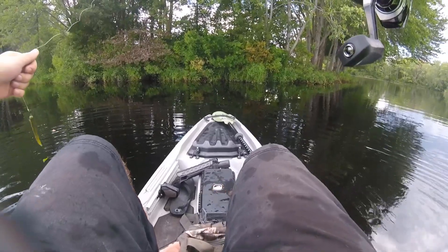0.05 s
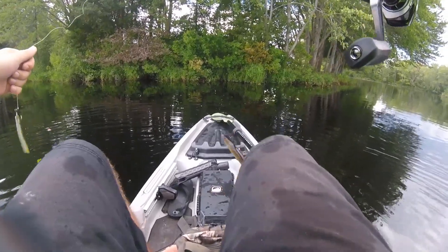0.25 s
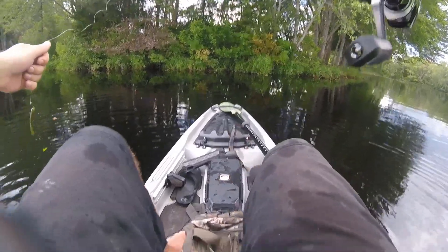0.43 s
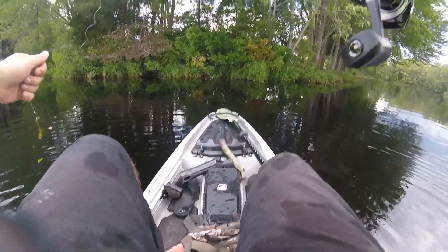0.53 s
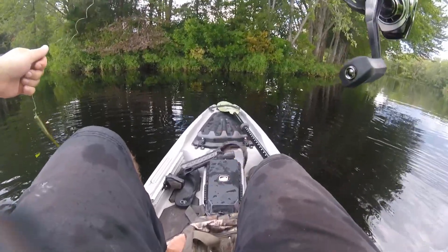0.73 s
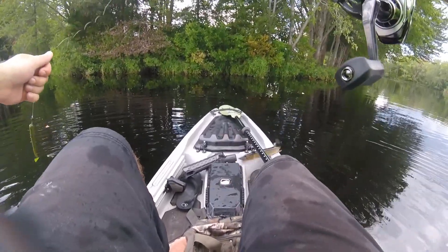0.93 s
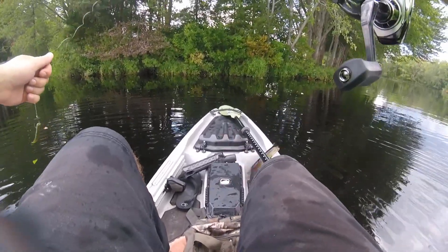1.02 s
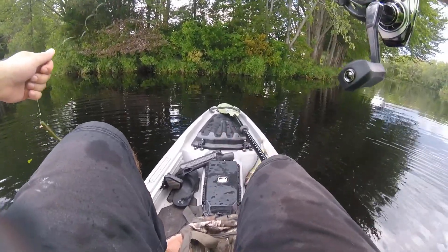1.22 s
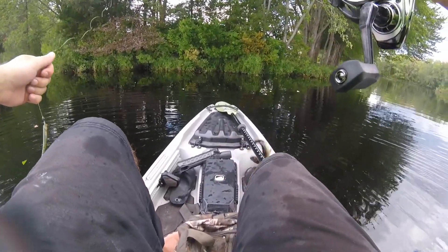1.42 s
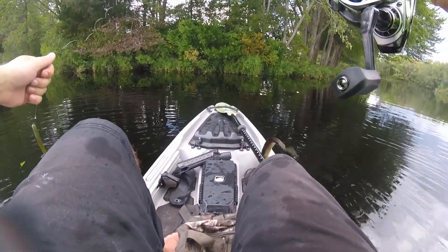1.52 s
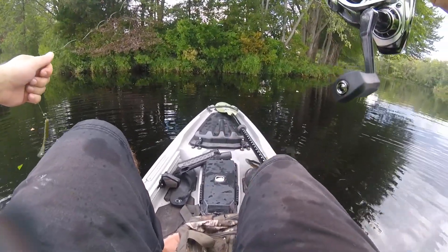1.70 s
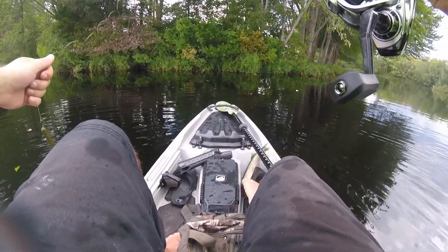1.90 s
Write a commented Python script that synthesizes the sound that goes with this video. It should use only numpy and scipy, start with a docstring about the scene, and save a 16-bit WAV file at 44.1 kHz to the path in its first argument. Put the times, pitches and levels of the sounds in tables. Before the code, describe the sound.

A small fish thrashes against a hollow plastic kayak, close to the microphone. Faint taps at 0.1 s, knocks at 0.2, a hard slap at 0.3, lighter clatter around 0.4, then the heaviest boomy smack at 0.59 with rapid knocks and wet scuffs to 0.72. Softer thumps at 0.8, 0.94 and 1.07; sparse ticks near 1.3, 1.45 and 1.56, a small flutter at 1.77. Low hull rumble, faint air and insect hiss.

```python
"""A small fish thrashes in the footwell of a plastic kayak: each slap excites decaying modes of the
hollow hull and cracks wetly, as a short ragged burst of noise with a tone in it.
Between slaps the body slides: random bumps rattle the hull modes and drops make a spattering hiss.
The floating hull rumbles as noise through low resonances, under still air (shaped noise) and a
throbbing band of insect hiss from the bank."""
import sys
import numpy as np
from scipy import signal
from scipy.fft import rfft, irfft
from scipy.io import wavfile
from scipy.ndimage import uniform_filter1d

SR = 44100
rng = np.random.default_rng(int(sys.argv[2]) if len(sys.argv) > 2 else 0)


def transcribe(signal):
    """Save signal, clipped to [-1, 1], as a 16-bit WAV file at the path in sys.argv[1]."""
    frames = np.atleast_2d(signal).T
    limited = np.clip(frames, -1, 1)
    pcm = np.round(limited * 32767).astype(np.int16)
    wavfile.write(sys.argv[1], SR, pcm)


N = 85995

# Hull modes, from low to high groups: (frequency [Hz], relative level [dB], 60 dB decay time [s])
DRUM_MODES = [(117.3, -4.5, 0.13), (166, -4, 0.11), (198.9, -6, 0.12)]
KNOCK_MODES = [(242.3, -5.5, 0.11), (295.5, -2, 0.073), (354.6, 1.5, 0.03), (482.2, -1, 0.066)]
PANEL_MODES = [(537.6, -1, 0.023), (715, -3, 0.041), (856.6, -17.5, 0.096), (984, -14.5, 0.056),
               (1111, -5.5, 0.039)]


def amp(db):
    """Level definition: 20 dB is a factor of ten in amplitude."""
    return 10 ** (np.asarray(db) / 20)


def unit_rms(x):
    """Normalization: scales a signal to unit root-mean-square amplitude."""
    return x / np.sqrt(np.mean(x ** 2) + 1e-20)


def colour(x, points):
    """Linear filtering: weights the spectrum by (Hz, dB) points, with steep skirts past the ends."""
    skirt_db = 50  # per unit of natural-log frequency
    hz, db = np.transpose(points)
    log_hz = np.log(np.fft.rfftfreq(len(x), 1 / SR) + 1)
    below = np.maximum(np.log(hz[0]) - log_hz, 0)
    above = np.maximum(log_hz - np.log(hz[-1]), 0)
    gain_db = np.interp(log_hz, np.log(hz), db) - skirt_db * (below + above)
    return irfft(rfft(x) * amp(gain_db), len(x))


def resonate(x, hz, width_hz):
    """Damped resonance: shifts its frequency to zero, low-passes with one pole and shifts back."""
    turn = np.exp(2j * np.pi * hz * np.arange(len(x)) / SR)
    pole = np.exp(-np.pi * width_hz / SR)
    return 2 * (turn * signal.lfilter([1 - pole], [1, -pole], x / turn)).real


def add(mix, start_s, sound):
    """Superposition: sums a sound into the mix from its start time."""
    part = mix[max(round(start_s * SR), 0):][:len(sound)]
    part += sound[:len(part)]


def still_air():
    """Broadband noise: white noise takes the spectrum of still air."""
    # Air spectrum: (frequency [Hz], relative density [dB])
    air_spectrum = [(12, -103), (20, -12.5), (102, 4.5), (154, -17.5), (325, -10.5), (596, -20.5),
                    (979, -24.5), (1520, -34.5), (2120, -33), (4980, -39.5), (6940, -31.5), (10200, -45.5),
                    (12100, -45.5), (14600, -56)]
    return amp(-44.5) * unit_rms(colour(rng.standard_normal(N), air_spectrum))


def hull_rumble():
    """Random excitation of resonances: noise drives low hull modes under a changing level."""
    # Rumble level: (time [s], level [dB])
    rumble_level = [(0, -44.5), (.2, -48), (.4, -25.5), (.55, -44), (.75, -32), (.9, -35.5), (1.05, -35),
                    (1.25, -48), (1.45, -46), (1.7, -46.5), (1.95, -50)]
    # Rumble resonances: (frequency [Hz], width of each of two passes [Hz], relative level [dB])
    rumble_modes = [(66.1, 2.4, -17), (101.6, 78, -4.5)]
    push = rng.standard_normal(N)
    rumble = np.zeros(N)
    for hz, width_hz, db in rumble_modes:
        rumble += amp(db) * unit_rms(resonate(resonate(push, hz, width_hz), hz, width_hz))
    level_db = np.interp(np.arange(N) / SR, *np.transpose(rumble_level))
    return amp(level_db) * unit_rms(rumble)


def insects():
    """Amplitude modulation: a narrow band of noise throbs with a slow random level."""
    hz, width_hz = 6700, 700  # width of each of two passes
    level_db, throb_db = -66, 4  # throb: RMS swing of the level
    hiss, throb = rng.standard_normal((2, N))
    band = resonate(resonate(hiss, hz, width_hz), hz, width_hz)
    throb = unit_rms(uniform_filter1d(uniform_filter1d(throb, 900), 900))
    return amp(level_db + throb_db * throb) * unit_rms(band)


def ring(modes, t, detuning, rise_s, centre_hz=None):
    """Modal superposition: sums decaying sines, weaker the farther from the struck spot's centre."""
    spot_db = 15.5  # loss per octave from the centre
    total = np.zeros(len(t))
    for k, ((hz, db, t60_s), shift) in enumerate(zip(modes, detuning)):
        loss_db = 0 if centre_hz is None else spot_db * abs(np.log2(hz / centre_hz))
        decay = amp(db - loss_db - 60 * t / t60_s)
        total += (-1) ** k * decay * np.sin(2 * np.pi * hz * (1 + shift) * t)
    return (1 - np.exp(-t / rise_s)) * total


def hull_boom(t):
    """Falling modal pitch: the lowest modes swell, starting sharp and sagging to pitch."""
    # Boom modes: (frequency [Hz], relative level [dB], 60 dB decay time [s])
    boom_modes = [(64.2, 1.5, 0.14), (46.4, -18.5, 0.57)]
    rise_s, sag, sag_s = 0.0057, 0.22, 0.026  # sag: initial fraction sharp, and its time constant
    sagging_t = t + sag * sag_s * (1 - np.exp(-t / sag_s))
    return (1 - np.exp(-t / rise_s)) * ring(boom_modes, sagging_t, np.zeros(2), rise_s)


def wet_crack(u, noise, ragged_noise, soft_s, crack_hz, crack_db, treble_db):
    """Impact noise: a softer contact lengthens the rise and decay of a ragged burst."""
    # Crack body spectrum: (frequency [Hz], relative level [dB])
    body_spectrum = [(800, 11.5), (1500, 0.5), (3000, 3.5), (4500, -18.5)]
    # Crack treble spectrum: (frequency [Hz], relative level [dB])
    treble_spectrum = [(4500, 7.5), (6300, 8.5), (8000, -2.5), (10000, -12.5), (11300, -7.5), (12500, -25),
                       (14000, -37)]
    body_db, tone_db = -9, -3  # tone at the crack's centre
    tail_db, tail_t60_s = -45.5, 0.09
    ragged = amp(0.58 * unit_rms(uniform_filter1d(uniform_filter1d(ragged_noise, 36), 36)))
    decay = amp(-60 * u / (0.018 + 6 * soft_s)) + amp(tail_db - 60 * u / tail_t60_s)
    burst = decay * (1 - np.exp(-(u / soft_s) ** 2)) * ragged
    tone = amp(tone_db) * np.sin(2 * np.pi * crack_hz * u)
    smack = unit_rms(colour(noise, body_spectrum)) + tone
    treble = unit_rms(colour(noise, treble_spectrum))
    return burst * (amp(crack_db + body_db) * smack + amp(treble_db) * treble)


def slaps():
    """Impulsive excitation: each slap cracks and rings the hull's mode groups, the boom arriving last."""
    # Slaps: (time [s], relative levels of crack, boom, drum, knock, panel and crack treble [dB],
    #         knock centre [Hz], crack centre [Hz], softness [ms], panel centre [Hz],
    #         plastic ring re crack [dB])
    slap_table = [(0.0777,-41.5,-29,-37.5,-34.5,-39,-52,302,3770,1.1,690,-3.5),(.1012,-43,-56,-35.5,-28.5,-44,-58,225,3940,1.2,615,-8),
                  (0.1858,-24,-22.5,-32,-15.5,-29,-46,405,3230,0.41,603,-9),(0.197,-16,-38,-37,-14,-15.5,-32.5,282,3000,2.7,960,-12),
                  (0.2149,-21,-49,-52,-13,-13.5,-45,296,2070,0.13,544,0.5),(0.2993,-4,-12,-8,-1.5,-11.5,-25.5,226,2880,0.33,920,-13.5),
                  (0.3087,-23,-19,-9.5,-12.5,-15,-34,269,2230,0.29,970,-20),(0.3175,-32,-14.5,-20,-11.5,-38,-44,357,2300,0.54,600,-14),
                  (0.3301,-24,-45,-47,-22,-23.5,-45,256,2380,1.5,610,-3),(.3445,-38,-35,-23,-22,-26,-60,262,2070,0.82,850,-12),
                  (0.4018,-13.5,-22,-34,-19,-20,-22,243,4786,1.2,815,-23),(0.4068,-14,-39,-34,-15,-21,-35,425,2180,0.51,1030,-27),
                  (0.418,-18.5,-43,-47,-18,-17,-62,273,2130,0.51,564,-10),(0.4528,-23.5,-24.5,-20,-37,-36,-38.5,502,2350,0.3,794,-7),
                  (0.4905,-47,-24,-33,-52,-40,-50,222,2320,0.97,840,9),(0.511,-35,-30,-49,-27,-36,-50,234,3280,1.4,1080,-3),
                  (0.5325,-34,-46,-42,-18,-27.5,-54,260,2530,0.98,810,-12),(0.5634,-29,-45,-35,-33,-34,-64,380,2660,0.57,1140,-16),
                  (0.587,-4,0.5,-9.5,-10.5,-6.5,-21,290,3400,0.84,1100,-11.5),(0.6117,-33,-23,-22,-7,-34,-56,273,2280,1,720,-7),
                  (0.6169,-22,-45,-35,-14.5,-19,-48,298,2390,0.59,790,-12),(0.6441,-12,-40,-15.5,-9.5,-14.5,-27,240,3460,0.62,1140,-21),(0.6598,-21,-45,-40,-24,-21,-50,300,2500,0.99,800,-7),(0.6659,-24,-18,-30,-10.5,-19,-45,295,2400,1.1,624,-2),
                  (0.6885,-19,-23,-19,-24,-20.5,-43,229,2250,0.77,775,-7),(0.698,-21,-45,-40,-28,-28,-44,300,3960,0.51,700,-14),(0.7078,-21,-43,-46,-19.5,-37,-58,306,2700,0.37,694,-14),
                  (0.7115,-19.5,-40,-31,-19.5,-18,-40,256,2510,1.4,600,-5.5),
                  (0.7966,-12.5,-6,-13.5,-19.5,-12.5,-29.5,221,3065,1.9,907,-2),(0.8161,-29,-11.5,-23,-19,-22.5,-33,330,2040,2.9,890,-8),
                  (0.851,-27,-56,-27,-19,-27.5,-47,241,2410,0.56,960,-19),(0.8683,-36,-53,-49,-52,-40,-60,221,2930,0.82,725,-3.5),
                  (0.9356,-14.5,-11.5,-14.5,-18,-14.5,-30.5,220,3055,1.3,890,-2.5),(0.9723,-28.5,-11.5,-24,-26,-36,-46,220,3010,0.97,716,-1.5),
                  (0.9866,-55,-41,-22.5,-22.5,-34,-60,245,2010,0.59,1050,-6),(1.0208,-42,-32,-35,-33.5,-35,-66,274,2230,1.5,610,-4),
                  (1.0713,-18,-11,-22,-21.5,-20,-36,220,3100,1.5,850,-4),(1.1005,-46,-46,-22.5,-32.5,-46,-70,314,1700,1.3,970,-16),
                  (1.139,-43,-42,-25.5,-43,-42,-72,226,2940,.9,700,-5),(1.1519,-32.5,-26,-32.5,-46,-60,-67,339,2050,0.69,670,-13),
                  (1.172,-44.5,-22.5,-47,-37.5,-44,-70,225,2940,1.2,676,-7),(1.287,-55,-58,-48,-42,-67,-63,308,2130,0.79,1080,-23),
                  (1.2927,-67,-56,-66,-30,-33,-51,433,2210,0.8,660,-16),(1.2998,-62,-57,-65,-33,-45,-46.5,386,2020,1.8,620,-11),
                  (1.3742,-38,-36.5,-33.5,-61,-73,-40.5,231,4200,0.32,600,0.5),(1.454,-20.5,-55,-57,-25,-25,-39,468,2200,0.53,1030,-10),
                  (1.479,-33,-53,-62,-68,-60,-42,376,2640,1.8,740,-14),(1.5,-36,-64,-57,-60,-66,-48,474,3920,1.3,600,-5),
                  (1.563,-21,-21.5,-39,-17,-26.5,-44,230,2095,0.56,524,-7),(1.7627,-34,-24.5,-31.5,-21.5,-38,-58,285,2780,0.89,646,-25),
                  (1.7697,-49,-50,-49,-34,-26.5,-62,314,3010,2.1,624,-17),(1.777,-32,-28.5,-44,-19,-29,-52,281,2440,4.9,790,-19),
                  (1.783,-26.5,-37,-45,-31,-35,-54,300,2460,2.8,695,-25),(1.7872,-28,-54,-39,-29,-27.5,-50,340,2500,0.8,790,-19),
                  (1.8015,-31,-54,-47,-21.5,-24.5,-50,272,2750,2.4,740,-3.5),(1.807,-27.5,-62,-34,-31,-29,-60,440,2680,1.6,650,-18)]
    # Plastic ring modes: (frequency [Hz], relative level [dB], 60 dB decay time [s])
    tick_modes = [(1750, -18, 0.018), (2343, -7, 0.019), (2940, -6.5, 0.041), (3886, 0.5, 0.017),
                  (6360, 4.5, 0.021)]
    boom_lag_s = 0.0043
    detune, stiffness = 0.054, 0.12  # RMS fraction of knock pitch; share of it in drum, panel and tick
    out, t = np.zeros(N), np.arange(SR // 4) / SR
    boom = hull_boom(t)
    knock_shifts = detune * rng.standard_normal((len(slap_table), 5))
    noises = rng.standard_normal((len(slap_table), 2, 4096))
    for row, knock_shift, (noise, ragged_noise) in zip(slap_table, knock_shifts, noises):
        (start_s, crack_db, boom_db, drum_db, knock_db, panel_db, treble_db,
         knock_hz, crack_hz, soft_ms, panel_hz, tick_db) = row
        soft_s = max(soft_ms, 0.1) / 1000
        shift = knock_shift * stiffness
        drum = amp(drum_db) * ring(DRUM_MODES, t, shift, 0.0027)
        knock = amp(knock_db) * ring(KNOCK_MODES, t, knock_shift, 0.00062 + soft_s, knock_hz)
        panel = amp(panel_db) * ring(PANEL_MODES, t, shift, soft_s, panel_hz)
        tick = amp(crack_db + tick_db) * ring(tick_modes, t, shift, soft_s, crack_hz)
        add(out, start_s + boom_lag_s, amp(boom_db) * boom)
        add(out, start_s, panel + tick - drum - knock)
        add(out, start_s, wet_crack(t[:4096], noise, ragged_noise, soft_s, crack_hz, crack_db, treble_db))
    return out


def random_hits(per_s, spread_db):
    """Poisson-like arrivals: sparse random hits with capped exponential levels."""
    heights = amp(spread_db * np.minimum(rng.exponential(1, N), 3))
    return heights * (rng.random(N) < per_s / SR)


def hull_rattle():
    """Damped modal response: soft bumps drive hull modes that ring about twice as long as after a slap."""
    flesh_hz, tilt_db = 1300, -7.5  # tilt per octave about 400 Hz
    width_t60 = 1.05  # mode width [Hz] times its decay time after a slap [s]
    flesh = signal.butter(3, flesh_hz, fs=SR, output="sos")  # a soft body's bumps carry little treble
    bumps = random_hits(660, 1) * rng.standard_normal(N)
    drive = signal.sosfilt(flesh, bumps)
    rattle = np.zeros(N)
    for hz, db, t60_s in DRUM_MODES + KNOCK_MODES + PANEL_MODES:
        mode = unit_rms(resonate(drive, hz, width_t60 / t60_s))
        rattle += amp(db + tilt_db * np.log2(hz / 400)) * mode
    return unit_rms(rattle)


def wet_spatter():
    """Shot noise: flung drops make decaying puffs of noise over the steady noise of a thin wet film."""
    drop_t60_s, film_db = 0.0086, 0.5
    puff = amp(-60 * np.arange(2048) / SR / drop_t60_s)
    envelope = signal.oaconvolve(random_hits(500, 2), puff)[:N]
    return (envelope + amp(film_db)) * rng.standard_normal(N)


def slides():
    """Friction noise: each drag of the body gates hull rattle and wet hiss together."""
    # Slides: (start [s], length [s], rattle level [dB], wet hiss level [dB],
    #          hiss brightness [dB per octave])
    slide_table = [(0.131, 0.042, -43, -55, 14), (0.177, 0.07, -31, -51, 6), (0.26, 0.065, -41, -56, 10),
                   (0.296, 0.063, -31.5, -49.5, 1.5), (0.375, 0.09, -33.5, -49.5, 9),
                   (0.525, 0.011, -33, -49.5, -11), (0.547, 0.009, -68, -55, 6),
                   (0.585, 0.035, -20.5, -35, 1), (0.635, 0.0077, -18.5, -28, -9.5),
                   (0.642, 0.0805, -27.5, -49.5, 9), (0.73, 0.042, -43, -61, 4),
                   (0.789, 0.035, -28, -37.5, 0.5), (0.835, 0.04, -34.5, -51.5, -5.5),
                   (0.923, 0.029, -51, -42, -7), (0.94, 0.05, -33.5, -56, 9), (1.059, 0.02, -55, -53.5, 4),
                   (1.071, 0.027, -38, -65, -4), (1.137, 0.04, -48.5, -62, -5),
                   (1.279, 0.014, -37, -56.5, 3), (1.428, 0.011, -59, -52, 3),
                   (1.459, 0.024, -49.5, -53, 9), (1.758, 0.058, -36, -56.5, 10),
                   (1.844, 0.046, -57, -56.5, 13.5)]
    # Wet hiss spectrum before brightness: (frequency [Hz], relative density [dB])
    wet_spectrum = [(760, 12.5), (1300, 5), (1650, 8.5), (2340, 11.5), (4600, -6), (6380, -7), (7790, -18),
                    (9880, -93), (11200, -67), (14000, -85)]
    edge_s = 0.008  # rise time; the fall after the slide takes twice as long
    t, out = np.arange(N) / SR, np.zeros(N)
    rattle, spatter = hull_rattle(), wet_spatter()
    for start_s, length_s, rattle_db, wet_db, bright_db in slide_table:
        fall = (start_s + length_s - t) / 2 + edge_s
        stroke = np.clip(np.minimum(t - start_s, fall) / edge_s, 0, 1)
        spectrum = [(hz, db + bright_db * np.log2(hz / 3000)) for hz, db in wet_spectrum]
        hiss = unit_rms(colour(spatter, spectrum))
        out += stroke * (amp(rattle_db) * rattle + amp(wet_db) * hiss)
    return out


def scene():
    """Linear superposition: the pressures of all sources add in one channel."""
    background = still_air() + hull_rumble() + insects()
    return (background + slaps() + slides())[None]


def record(dry):
    """Band limitation: a linear-phase low-pass removes the highest treble."""
    low_pass = signal.firwin(511, 14600, window=("kaiser", 9), fs=SR)  # cutoff in Hz
    return signal.oaconvolve(dry, low_pass[None], "same")


dry = scene()
out = record(dry)
transcribe(out)
```